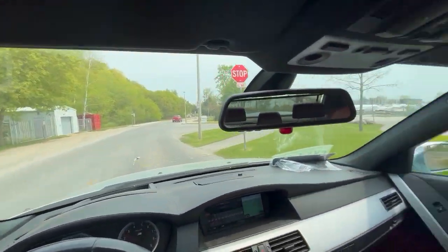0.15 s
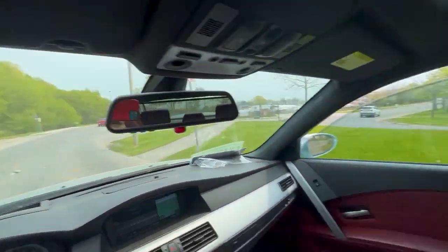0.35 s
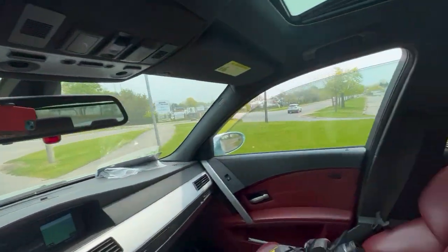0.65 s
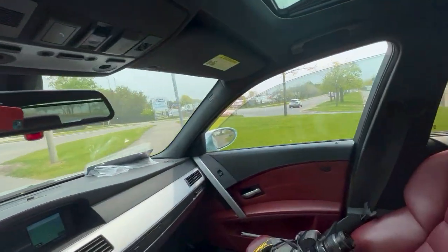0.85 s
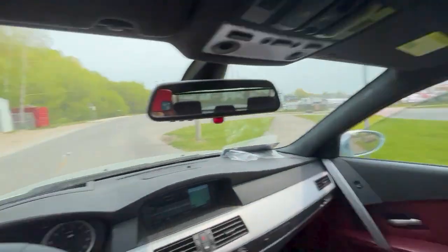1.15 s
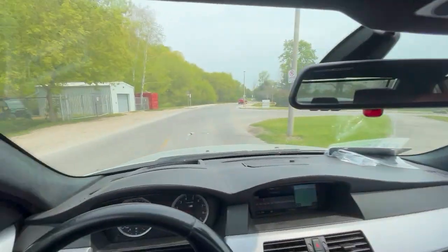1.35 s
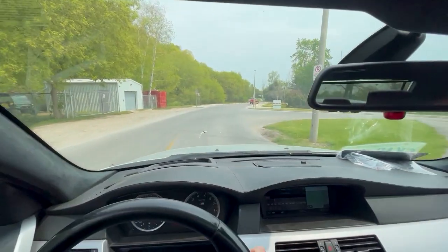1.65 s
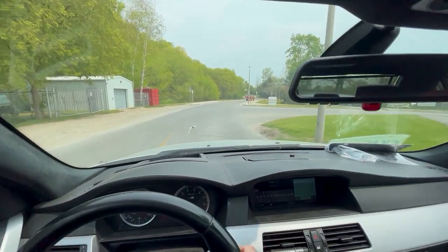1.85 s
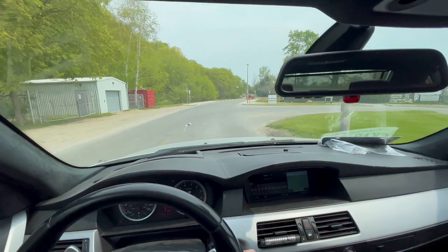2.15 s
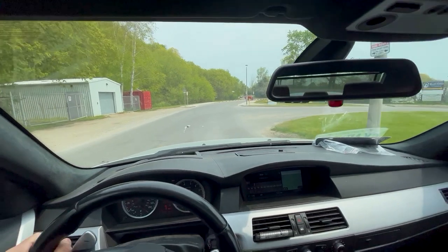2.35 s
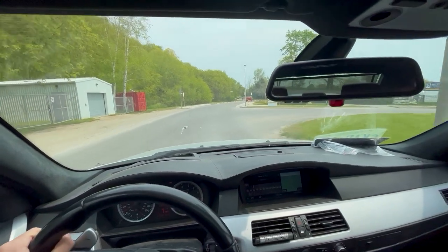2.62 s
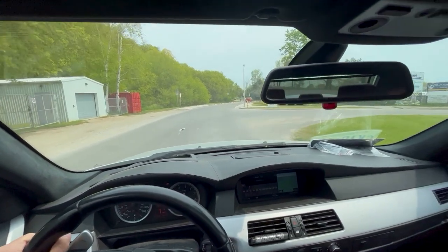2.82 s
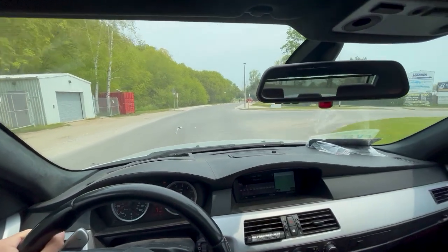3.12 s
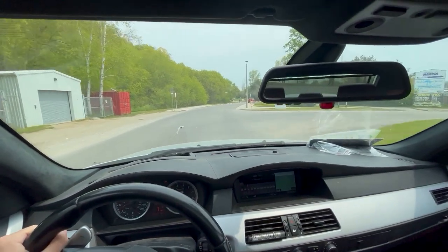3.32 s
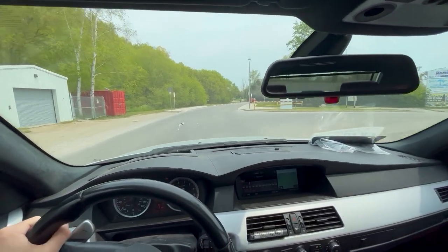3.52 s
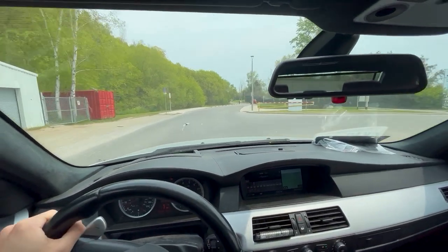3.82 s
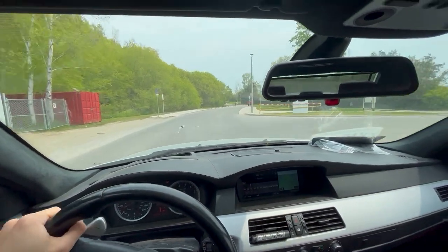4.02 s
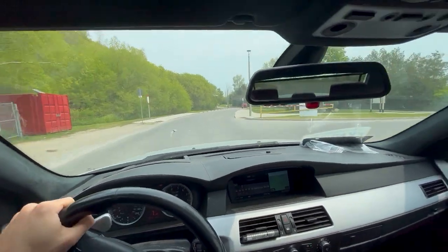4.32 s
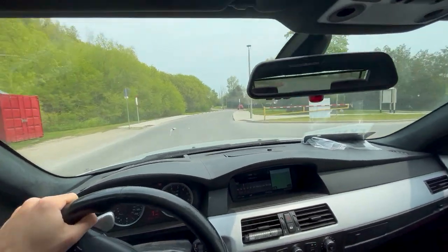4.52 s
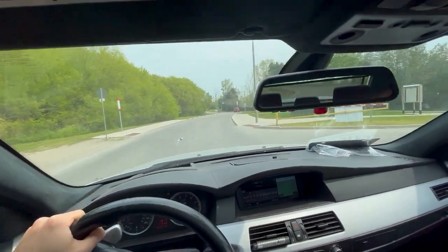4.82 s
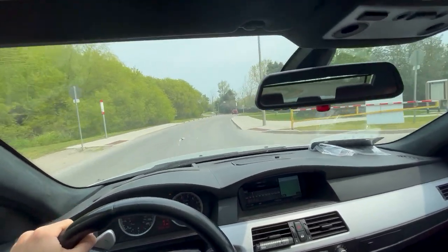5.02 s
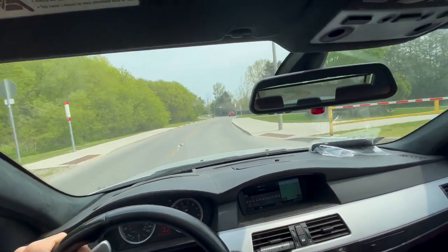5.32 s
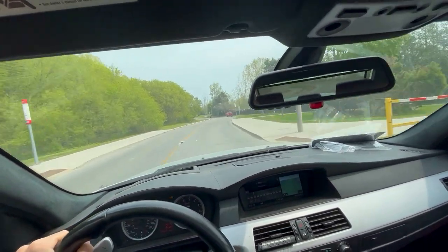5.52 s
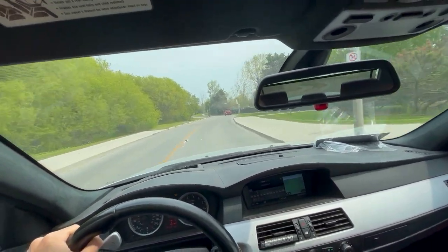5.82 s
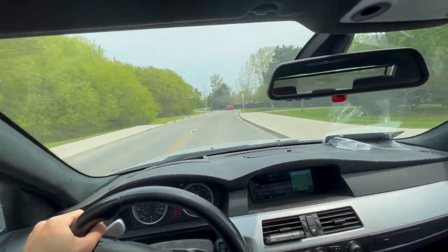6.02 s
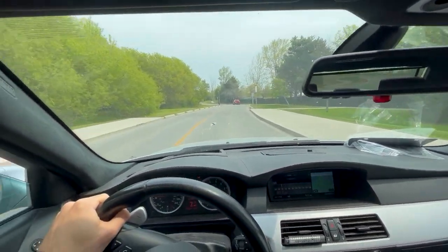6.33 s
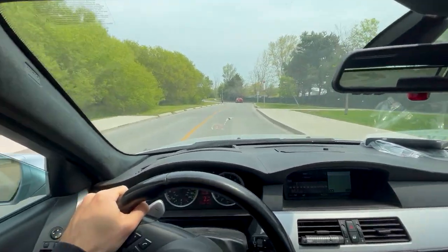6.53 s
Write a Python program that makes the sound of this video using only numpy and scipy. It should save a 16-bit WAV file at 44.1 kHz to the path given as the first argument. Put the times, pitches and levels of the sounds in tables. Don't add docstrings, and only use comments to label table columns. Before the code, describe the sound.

A close stereo cabin perspective: boomy engine drone falling to a low burble, faint squeak and scattered light ticks, then a steady rise to a throaty, resonant note about twice as high or more. Belt whine, intake roar and soft road noise thicken with speed. Small creaks, console bumps and a hand rub on the wheel sit on top. The throttle eases, the engine falls back, and a short plastic rattle follows.

```python
import sys
import numpy as np
from scipy import signal
from scipy.fft import rfft, irfft, next_fast_len
from scipy.io import wavfile
from scipy.ndimage import uniform_filter1d, minimum_filter1d

SR = 44100
rng = np.random.default_rng(int(sys.argv[2]) if len(sys.argv) > 2 else 0)


def volts_from_decibels(level):
    exponent = np.asarray(level, float) / 20
    return 10 ** exponent


def file_out(sig):
    cols = np.atleast_2d(sig).T
    lim = np.clip(cols, -1, 1)
    pcm = np.round(lim * 32767).astype(np.int16)
    wavfile.write(sys.argv[1], SR, pcm)


N = 294052


def columns(rows):
    s, *values = np.transpose(rows)
    return [np.interp(np.arange(N) / SR, s, v) for v in values]


def at_hz(rows, hz, axis=1):
    rows = np.array(rows)
    return np.interp(np.log(hz), np.log(rows[:, 0]), rows[:, axis])


def drift(rate, size=1):
    r = np.exp(-128 * np.pi * rate / SR)
    slow = signal.lfilter([1], [1, -2 * r, r * r], rng.standard_normal(N // 64 + 1502))[1500:]
    return np.interp(np.arange(0, N, size) / 64, np.arange(len(slow)), slow / np.std(slow))


def swells(events):
    t = np.arange(N) / SR
    return sum(volts_from_decibels(db) * np.cos(np.pi / 2 * np.clip((t - s) / half, -1, 1)) ** 2 for s, half, db in events)


def left_right(common, difference):
    return np.array([common + difference, common - difference])


def sides(pan_db):
    return pan_db * np.array([[.5], [-.5]])


def ticks(events, hz, width, t60, snap, ring_hz):
    out, age = np.zeros((2, N)), np.arange(6000) / SR
    band = signal.butter(2, np.clip([hz / width, hz * width], 300, 16500), "band", fs=SR, output="sos")
    ring = signal.butter(1, [ring_hz / 1.05, ring_hz * 1.05], "band", fs=SR, output="sos")
    for s, peak_db, pan_db in events:
        noise = rng.standard_normal((2, len(age))) + .7 * rng.standard_normal(len(age))
        tail = np.minimum(age / 0.0038, 1) * volts_from_decibels(-60 * age / t60)
        shape = snap * np.exp(-age / 0.0044) + .5 * tail
        burst = signal.sosfilt(band, noise * shape)
        burst += 1.3 * signal.sosfilt(ring, noise * volts_from_decibels(-36 * age / t60))
        at = round(s * SR)
        out[:, at:at + len(age)] += volts_from_decibels(peak_db + sides(pan_db)) * burst / np.abs(burst).max()
    return out


# [multiple of the cycle, level/dB]
FIRING_DB = [(5, 0.0), (10, -4.5), (15, -8), (25, -25.5)]
# [f/Hz, level/dB]
PIPE_LOW = [(56, -4.5), (80, -2), (99, 10), (112, 15), (150, 10), (166, -4), (185, -4.5), (215, -20)]
# [f/Hz, half width/Hz, level/dB, share of load dB]
PIPE_HIGH = [(252.3, 10, -3.5, 2.0), (274.6, 13, -1.5, 2.0), (332.6, 15, 1.5, 2), (400, 19, 4, 1.83),
             (455, 6.3, -16, 2.5), (583, 7.5, 7, 4), (522, 23, 10.5, 2.14), (614, 14, 11, 2.5),
             (660, 82, 8.5, 3)]


def firing_order_db(multiple, hz, load_db, pulse_db):
    upper = 0
    for top_hz, width, db, share in PIPE_HIGH:
        upper = upper + volts_from_decibels(db + share * load_db) / (1 + ((hz - top_hz) / width) ** 4)
    boom = volts_from_decibels(pulse_db + at_hz(PIPE_LOW, hz))
    return dict(FIRING_DB)[multiple] + 20 * np.log10(boom + upper)


# [multiple of the cycle, level/dB]
UNEVEN_DB = [(1, -17.5), (2, -1), (3, -7.5), (4, -13), (6, -9.5), (7, -7), (8, -5), (9, -11), (19, -18.5),
             (23, -21)]
REST_DB, REST_FALL_DB, FIFTH_DB = -10, 0.37, -2
GROWL_FROM_HZ = 170
# [t/s, half length/s, level/dB]
STUMBLE = [
    (3.65, 0.27, -4.5),
    (4.2, 0.27, -3.5),
]


def uneven_order_db(multiple, hz, load_db):
    rest_db = REST_DB - REST_FALL_DB * multiple + FIFTH_DB * (multiple % 5 == 0)
    growl_db = 20 * np.log10(1 + swells(STUMBLE)[::8])
    growl_share = np.clip(hz / GROWL_FROM_HZ - 1, 0, .2) / .2
    return dict(UNEVEN_DB).get(multiple, rest_db) + load_db + growl_db * growl_share


# [multiple of the cycle, loudest f/Hz,
# spread/octaves, common level/dB, difference level/dB, share of load dB, wobble/rad]
WHINES = [(7.994, 255, 0.04, -35, -35, 1.5, 0.2), (8.82, 260, 0.07, -41.5, -35.5, 0.74, 0.088),
          (6.886, 248, 0.045, -37, -40, 1.1, 0.11), (29.6, 700, 0.06, -50.5, -48.5, 0.64, 0.4),
          (22, 415, 0.12, -54, -56.5, -0.5, .5), (44.3, 835, 0.046, -60.5, -61.5, 0, 0.38),
          (60.2, 1860, 0.13, -69, -68.5, 1.3, 1), (60, 1500, 0.1, -67.5, -66, 0.5, 0.65),
          (83, 1170, 0.09, -63.5, -64, -.2, .6), (81, 1450, .2, -68.5, -68.5, 0, .5),
          (83, 1740, 0.06, -63.5, -65.5, 0.5, .5), (82, 1600, .1, -72, -71, .5, .9),
          (82.6, 1920, .05, -75, -74, 1.5, .5), (45.3, 1570, 0.055, -68, -62, 1.6, 0.79)]
PANEL_ORDERS = [(26, 420, .08, -46.5, -47, 0.6, .15), (35.06, 700, 0.064, -62.5, -54, 0.5, .4),
                (41, 440, 0.05, -61.5, -55.5, 0.7, .4), (16.3, 200, .09, -46.5, -43.5, 1.6, .4),
                (16.8, 250, 0.096, -42, -42.5, 2.4, .4), (17, 250, 0.12, -47, -46, -0.2, 0.35),
                (18.94, 250, .08, -45.5, -44.5, 2.7, 0.37), (19.6, 268, 0.069, -45.5, -44.5, 2.4, .4),
                (23.15, 590, 0.12, -56, -50, 1.36, .3), (24, 670, .07, -55.5, -46.5, 1.16, .4),
                (10.8, 270, 0.061, -48, -40, 0.8, .3), (6.9, 205, 0.089, -40, -39.5, 0.5, 0.65),
                (7.91, 148, 0.12, -36.5, -47.5, -0.79, 0.94), (13.09, 400, 0.079, -48, -45, 1.27, 0.21),
                (14, 440, 0.062, -50, -46.5, -0.3, .3), (20.94, 410, 0.032, -53, -47, 1.7, 0.55),
                (10.92, 345, 0.05, -42.5, -51.5, 0.4, 0.68), (12.16, 378, 0.019, -48, -45.5, 1.35, .3),
                (24.8, 870, 0.067, -64, -66.5, 4, 0.25), (2.018, 62, 0.36, -25, -46, 0.1, 0.15),
                (9.94, 345, .08, -51, -47, 0.4, 0.41)]
DOOR_ORDERS = [(27, 305, .06, -58, -49, .5, .3), (24.5, 300, .1, -59, -52.5, 0.61, .3),
               (19.4, 520, 0.068, -55, -50, .5, .3), (24.3, 430, .08, -59, -53.5, .5, .3),
               (17.1, 300, .1, -55.5, -51.5, .8, .3), (17.9, 220, .1, -56, -51, .8, .3),
               (35.4, 615, .09, -62, -53, .8, .2), (41.2, 780, 0.086, -61.5, -54.5, 0.68, .2),
               (19.8, 640, .08, -58.5, -54.5, .8, .3), (29.2, 1010, .05, -62.5, -52, .5, .2),
               (27, 900, .08, -63, -55, .8, .3), (15.1, 460, 0.11, -52.5, -54, -1.5, 0.24),
               (15.3, 437, .08, -55, -43, 0.69, .15), (24.9, 870, .05, -61, -52.5, 1, .2),
               (11, 345, 0.059, -49.5, -45, 1, .2), (8.85, 320, 0.051, -46, -42, 1.1, .2),
               (7.2, 222, 0.034, -45, -44.5, 0.2, .2), (11.9, 375, 0.065, -51, -50, 1, .2),
               (17.9, 500, 0.046, -57, -52, 1, .2), (19.1, 530, 0.06, -57.5, -53.5, 1.7, .2),
               (20, 700, .05, -60, -56.5, 1, .3), (13.1, 455, 0.037, -54, -55, 0.74, 0.32),
               (10, 312, .07, -50, -41, .8, .2), (30, 800, 0.091, -58.5, -55, .8, .3),
               (30, 930, 0.072, -60, -56.5, .8, .2), (35, 1200, 0.071, -62, -60, 0.93, .4)]


def add_resonant_orders(common, difference, turn, cycle_hz, load_db, phases):
    for row in list(WHINES) + list(PANEL_ORDERS) + list(DOOR_ORDERS):
        multiple, peak_hz, octaves, common_db, difference_db, share, wobble = row
        phase, lead = phases.get(round(multiple), (multiple * turn, np.pi / 2))
        phase = phase + wobble * drift(15, size=8)
        off = np.log2(multiple * cycle_hz / peak_hz) / octaves
        near = np.abs(off) < 2
        level_db = -6 * off ** 4 + share * load_db + 3.2 * wobble * drift(5.4, size=8)
        level = volts_from_decibels(level_db[near])
        common[near] += level * volts_from_decibels(common_db) * np.sin(phase[near])
        difference[near] += level * volts_from_decibels(difference_db) * np.sin((phase + lead)[near])


# [t/s, bank firing rate f/Hz]
REVS = [(0.0, 98.35), (0.45, 87.65), (0.8, 70.56), (1.12, 60.49), (1.5, 55.52), (1.62, 57.52),
        (1.96, 58.02), (2.5, 78.35), (3.25, 117.1), (4.1, 156.2), (4.62, 173.1), (5.0, 178.3), (5.4, 174.8),
        (5.65, 153), (5.9, 140.5), (6.2, 136.6), (6.4, 127.5), (6.667, 122)]
# [t/s, load level/dB, exhaust pulse level/dB]
THROTTLE = [(0.0, -8, -10.5), (0.5, -13, -4), (1.0, -9.5, 1.5), (1.5, -6, -1), (1.62, -10, -8),
            (1.83, -6.5, -7), (2.03, -1.5, 5.5), (2.45, 2, 11.5), (2.75, 8, -4.5), (3.0, 3, -3.5),
            (3.7, 7, 5), (4.2, 4, 1.5), (5.42, 0.25, 9.5), (5.48, -4.5, 1), (5.95, 0.5, -3.5),
            (6.25, -0.5, -2.5), (6.38, 0.5, 1.5), (6.667, -1.5, 1)]
# [f/Hz, common level/dB, left-right difference level/dB, phase lead of the difference/rad]
BOOM = [(20.1, -64.5, -49, 1.6), (46.7, -29, -50.5, 1.3), (73, -23, -31.5, 0.65), (92.6, -12, -27.5, 0.4),
        (114, -16.5, -36, -2.6), (127, -18, -36, -0.95), (159.6, -21, -35.5, 0.62),
        (162.2, -35.5, -35, -0.5), (218, -30.5, -39, 0.1), (246, -35, -30.5, 1.6),
        (268.5, -29.5, -31, -0.72)]
PANELS = [(263.4, -37, -35.5, -4), (300, -34.5, -28, 2), (320, -36, -34, -3.5), (373, -38.5, -35.5, -3),
          (390, -37, -34.5, -3), (428, -36, -36.5, -0.8), (546, -40, -37, 1.37), (552, -41, -40, -1.2),
          (586, -41, -36, 1.6), (644, -44, -33.5, 2), (690, -41, -32.5, 1.4), (770, -52.5, -37, 0.5),
          (985, -37.5, -44, 6), (1430, -57.5, -37, 1)]
SAG_S, SAG_HALF_S, SAG_HZ = 5.19, 0.14, 2


def engine(flutter_db, wobble_rad, uneven_db):
    (bank_hz,), (load_db, pulse_db) = columns(REVS), columns(THROTTLE)
    bank_hz = bank_hz - SAG_HZ * swells([(SAG_S, SAG_HALF_S, 0)])
    cycle_hz = uniform_filter1d(bank_hz, size=3000) / 5
    turn = 2 * np.pi * np.cumsum(cycle_hz) / SR
    turn, cycle_hz, load_db, pulse_db = (x[::8] for x in (turn, cycle_hz, load_db, pulse_db))
    common, difference = np.zeros(len(turn)), np.zeros(len(turn))
    cabin, phases = list(BOOM) + list(PANELS), {}
    for multiple in range(1, 41):
        hz, fires = multiple * cycle_hz, multiple in dict(FIRING_DB)
        if fires:
            order_db = firing_order_db(multiple, hz, load_db, pulse_db)
        else:
            order_db = uneven_order_db(multiple, hz, load_db) + uneven_db
        rough = np.clip(hz / 400, .25, 1.5)
        rough = rough * (.3 if fires else .7)
        level = order_db + 0.5 + rough * flutter_db * drift(12, size=8)
        phase = multiple * turn + rng.uniform(0, 2 * np.pi) + rough * wobble_rad * drift(0.67, size=8)
        path = [uniform_filter1d(at_hz(cabin, hz, axis=k), size=200) for k in (1, 2, 3)]
        common_db, difference_db, lead = path
        phases[multiple] = phase, lead
        common += volts_from_decibels(level + common_db) * np.sin(phase)
        difference += volts_from_decibels(level + difference_db) * np.sin(phase + lead)
    add_resonant_orders(common, difference, turn, cycle_hz, load_db, phases)
    both = left_right(common, difference)
    full = signal.resample_poly(both, 8, 1, axis=1, window=("kaiser", 11), padtype="antireflect")
    return full[:, :N]


# [t/s, speed/(m/s)]
SPEED = [
    (0.0, 1.7),
    (0.6, 4.3),
    (1.2, 1.9),
    (1.8, 1.8),
    (2.7, 1.8),
    (3.6, 3.5),
    (4.1, 5.3),
    (4.9, 7),
    (5.5, 7.7),
    (6.667, 6.7),
]
CRUISE_M_S, CRUISE_HZ = 7, 175


def speed_doublings():
    return np.log2(np.maximum(columns(SPEED)[0], .1) / CRUISE_M_S)


# [f/Hz, common level per Hz/dB, difference level per Hz/dB]
NOISE = [(18, -79, -88.5), (47.6, -48, -69.5), (63.5, -38.5, -48), (106, -37.5, -56.5), (144, -40, -57),
         (173.6, -53, -65), (271, -61, -59), (565, -73.5, -70), (960, -77.5, -72), (2500, -92, -92),
         (4450, -95.5, -93.5), (8400, -104, -106), (12700, -122, -114), (15800, -112, -116)]
# [f/Hz, left-right level/dB]
BALANCE_DB = [(60, -0.5), (110, 1), (200, -0.5), (380, -0.5), (700, 3.5), (1290, -0.5), (2380, 1.5),
              (4400, -8), (8120, -1.5), (15000, 2)]
# [t/s, half length/s, level/dB]
BUMPS = [
    (3.0, 0.24, 6),
    (6.5, 0.046, -9.5),
]
# (dB at cruise, dB per doubling of road speed, per doubling of revs, share of load dB)
RUMBLE, ROAR = (2.5, 6.5, -1.5, 0.14), (-2, 2, 2.5, 1.03)
TYRES, HISS = (0.1, 2.5, 6.2, 0.038), (-3, 2, 6, 0.5)
COAST_S, COAST_HALF_S, COAST_DB = 0.53, .7, -2.5
IDLE_ROAR_DB = -11.5
MOVE_HISS_DB = 72


def road(patchy_db, opposed):
    revs_doublings = np.log2(columns(REVS)[0] / CRUISE_HZ)
    controls = np.array([np.ones(N), speed_doublings(), revs_doublings, columns(THROTTLE)[0]])
    lead_hz = np.log([120, 300, 1500, 5000])
    change_db = np.array([RUMBLE, ROAR, TYRES, HISS]) @ controls
    change_db[1] = 10 * np.log10(volts_from_decibels(2 * change_db[1]) + volts_from_decibels(2 * IDLE_ROAR_DB))
    change_db[1:3] += COAST_DB * swells([(COAST_S, COAST_HALF_S, 0)])
    change_db[0] += 20 * np.log10(1 + swells(BUMPS))
    change_db[-1] = 20 * np.log10(volts_from_decibels(change_db[-1]) + volts_from_decibels(MOVE_HISS_DB) * swells(MOVES))
    size = next_fast_len(N)
    hz = np.maximum(np.arange(size // 2 + 1) * SR / size, 1)
    white = rfft(rng.standard_normal((2, size))) * np.sqrt(SR / 2)
    white[1] += opposed * 1j * white[0] * (hz < 170)
    shaped = white * volts_from_decibels([at_hz(NOISE, hz), at_hz(NOISE, hz, axis=2)])
    out, together = 0, drift(2.7)
    for centre in 20 * 2 ** np.arange(0, 10, .5):
        window = np.cos(np.pi * np.clip(np.log2(hz / centre), -.5, .5)) ** 2
        share = [np.interp(np.log(centre), lead_hz, row) for row in np.eye(4)]
        flicker = patchy_db * (0.27 * together + drift(4.9)) * np.clip(centre / 1500, .2, 1)
        band = left_right(*irfft(shaped * window, size)[:, :N])
        out = out + volts_from_decibels(share @ change_db + flicker + sides(at_hz(BALANCE_DB, centre))) * band
    return out


# [t/s, half length/s, rustle level/dB]
MOVES = [
    (1.18, 0.16, -82.5),
    (1.46, 0.22, -81.5),
    (2.09, .09, -88),
    (2.32, 0.23, -84),
    (3.34, 0.57, -86),
    (4.75, 0.23, -86),
    (4.97, 0.11, -77),
    (6.6, 0.33, -87.5),
]
SEAT_DB, SEAT_DB_PER_DOUBLING = -89, 12.5


def rustle(grains_per_s, spread_db):
    born = rng.random((2, N)) < grains_per_s * volts_from_decibels(4 * drift(25)) / SR
    sizes = volts_from_decibels(spread_db * np.minimum(rng.exponential(1, (2, N)), 4))
    grains = born * sizes * rng.choice([-1, 1], (2, N))
    band = signal.butter(1, [8000, 17000], "band", fs=SR, output="sos")
    bright = signal.sosfilt(band, grains + 1e-18)
    level = swells(MOVES) + volts_from_decibels(SEAT_DB + SEAT_DB_PER_DOUBLING * speed_doublings())
    return volts_from_decibels(14.5) * level * bright / np.std(bright)


# [t/s, peak level/dB, left-right level/dB]
PIN_TICKS = [
    (0.1104, -54, 1.5),
    (0.7364, -48, -2),
    (0.838, -63.5, -2),
    (1.2104, -55.5, -1.5),
]
LOW_TICKS = [
    (0.1106, -50.5, -8.5),
    (1.9, -57, -4),
]
BRIGHT_TICKS = [
    (0.2195, -59, -4),
    (1.0272, -52.5, 0.5),
    (1.5847, -48.5, -1),
    (1.8786, -57, -1.5),
    (1.8954, -52, -6.5),
    (2.3234, -44.5, -4),
    (2.6355, -54.5, -2),
    (2.7485, -54.5, -2),
    (4.565, -40, -2.5),
    (4.7182, -44, -9),
]
PINGS = [
    (0.76, -47, -4.5),
]
TRIM_TICKS = [(1.0721, -50.5, -3.5), (1.2156, -48.5, -2), (1.4895, -54, -7), (1.6101, -53.5, -6),
              (2.037, -60, -6), (2.088, -58, -7.5), (2.188, -56, -5), (2.2662, -55, -7),
              (2.2855, -51.5, -3.5), (2.2989, -46, -7), (2.3436, -44.5, -7), (2.3644, -49.5, -7),
              (2.3794, -61.5, -8), (2.4838, -61, -8.5), (3.1043, -46.5, -9.5), (4.3832, -45.5, -3),
              (4.6898, -49, 0)]
THIN_TICKS = [
    (1.1398, -39.5, 6),
    (1.3538, -52, 0),
    (2.3414, -47.5, 3.5),
    (2.797, -55, 3.5),
    (4.812, -37.5, 2.5),
]
DULL_TICKS = [
    (1.7751, -62, -5),
    (1.8911, -52, -0.5),
    (1.8949, -50, 0),
    (2.3453, -45.5, -1.4),
    (2.7328, -49, -1),
    (3.5976, -42, 0.92),
]
KNOCKS = [
    (4.812, -30.5, -7.5),
    (4.822, -38, -8),
]


def trim_ticks():
    trim = ticks(PIN_TICKS, hz=8040, width=1.5, t60=.04, snap=.8, ring_hz=8100)
    trim += ticks(LOW_TICKS, hz=4000, width=2.3, t60=.07, snap=.6, ring_hz=4500)
    trim += ticks(BRIGHT_TICKS, hz=6800, width=2.8, t60=0.099, snap=0.37, ring_hz=6300)
    trim += ticks(PINGS, hz=6300, width=1.25, t60=.1, snap=.5, ring_hz=6240)
    trim += ticks(TRIM_TICKS, hz=4470, width=1.7, t60=0.13, snap=0.59, ring_hz=4700)
    trim += ticks(THIN_TICKS, hz=11500, width=1.2, t60=.06, snap=.8, ring_hz=14500)
    trim += ticks(DULL_TICKS, hz=2507, width=2.1, t60=0.042, snap=0.75, ring_hz=2300)
    trim += ticks(KNOCKS, hz=4910, width=1.35, t60=0.055, snap=0.45, ring_hz=5040)
    return volts_from_decibels(1.5) * trim


# [start t/s, end t/s, level/dB]
SQUEAK = [
    (0.34, 0.387, -63),
    (0.398, .435, -69),
]


def squeak():
    t = np.arange(N) / SR
    gate = 0
    for start, end, db in SQUEAK:
        gate = gate + volts_from_decibels(db) * np.clip(np.minimum(t - start, end - t) / .006, 0, 1)
    return gate * np.sin(2 * np.pi * 1980 * t) * np.ones((2, 1))


# [t/s, peak level/dB, left-right level/dB]
CREAKS = [
    (0.764, -51, 4.5),
    (1.584, -50, -2),
    (1.797, -52.5, -2.5),
    (1.896, -44, 0),
    (3.598, -38, 1),
    (4.812, -35, 4.5),
    (6.299, -41.5, 0),
    (6.399, -42, -1.5),
    (6.426, -45.5, 12.5),
]


def creaks():
    return volts_from_decibels(2) * ticks(CREAKS, hz=850, width=1.3, t60=0.11, snap=0.2, ring_hz=975)


# [t/s, peak level/dB, left-right level/dB]
THUDS = [
    (1.586, -50, 1.5),
    (1.797, -40, 2),
    (1.805, -44, 0.5),
    (1.893, -51, -0.5),
    (2.787, -46.5, 1),
    (4.276, -41, 1.5),
    (5.985, -42.5, -2.5),
]


def thuds():
    return ticks(THUDS, hz=637, width=1.1, t60=0.066, snap=0.62, ring_hz=523)


# [t/s, peak level/dB, left-right level/dB]
SCUFFS = [
    (4.84, -49.5, -3.5),
    (4.87, -49.5, -1),
    (4.91, -49, -3.5),
    (4.95, -46.5, -3.5),
    (4.98, -50, -2.5),
]


def scuffs():
    return ticks(SCUFFS, hz=4460, width=1.08, t60=0.16, snap=.05, ring_hz=4540)


# [t/s, peak level/dB, left-right level/dB]
RATTLE = [
    (6.3361, -46, 2),
    (6.3491, -42, 1.5),
    (6.362, -45, 1.3),
    (6.3756, -42, 0),
    (6.396, -47, 2),
]
CLIP_MODES = [(1060, 6), (1750, -2.5), (2200, -3.5), (2500, -5.5), (3450, -8.5), (3900, -11)]


def rattle(t60):
    out = np.zeros((2, N))
    s, peak_db, pan_db = np.transpose(RATTLE)
    for hz, db in CLIP_MODES:
        clicks = np.zeros((2, N)) + 1e-18
        chance_db = rng.normal(0, 0.67, (2, len(s)))
        clicks[:, (s * SR).astype(int)] = volts_from_decibels(peak_db + db + sides(pan_db) + chance_db)
        r, w = volts_from_decibels(-60 / (t60 * SR)), 2 * np.pi * hz / SR
        out += signal.lfilter([0, np.sin(w)], [1, -2 * r * np.cos(w), r * r], clicks)
    return out


def scene():
    cabin = engine(flutter_db=3.5, wobble_rad=0.11, uneven_db=-6.0)
    cabin += volts_from_decibels(-1) * road(patchy_db=1.5, opposed=1.0)
    cabin += rustle(grains_per_s=6000, spread_db=2.0)
    cabin += trim_ticks()
    cabin += squeak()
    cabin += creaks()
    cabin += thuds()
    cabin += scuffs()
    cabin += rattle(t60=0.022)
    return cabin


def roll_off(x):
    return signal.sosfilt(signal.butter(12, 15820, fs=SR, output="sos"), x)


PORT_NULL_HZ = 12500
CLOCK_HZ, CLOCK_DB = 9600, -60.5


def record(dry):
    common = dry.mean(0)
    null = signal.butter(2, [PORT_NULL_HZ - 900, PORT_NULL_HZ + 900], "bandstop", fs=SR, output="sos")
    x = dry + .7 * (signal.sosfiltfilt(null, common) - common)
    x = x * (1 + volts_from_decibels(CLOCK_DB) * np.cos(2 * np.pi * CLOCK_HZ * np.arange(N) / SR))
    over = np.maximum(np.abs(x).max(0) / .97, 1)
    gain = uniform_filter1d(minimum_filter1d(1 / over, size=441), size=441)
    return roll_off(x * gain)


dry = scene()
out = record(dry)
file_out(out)
```